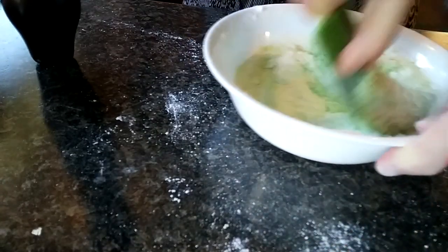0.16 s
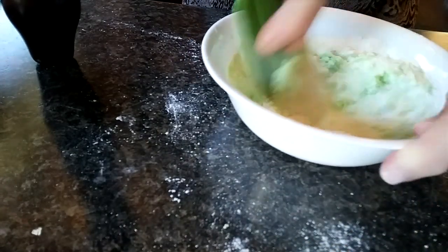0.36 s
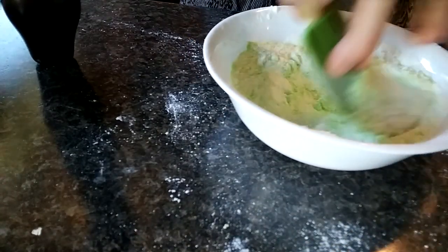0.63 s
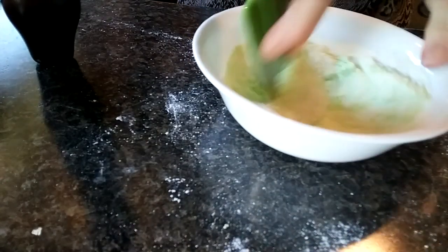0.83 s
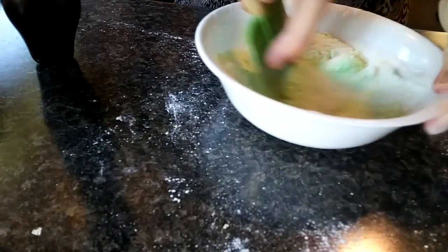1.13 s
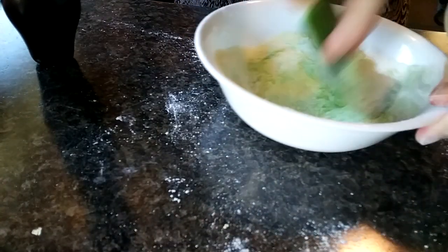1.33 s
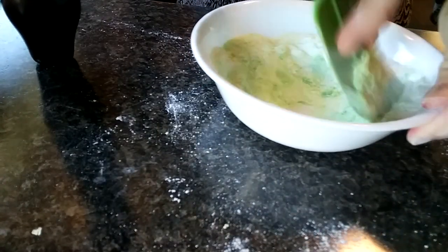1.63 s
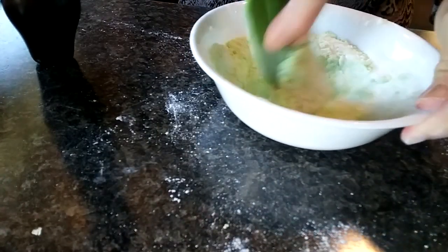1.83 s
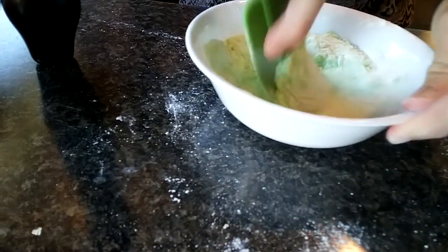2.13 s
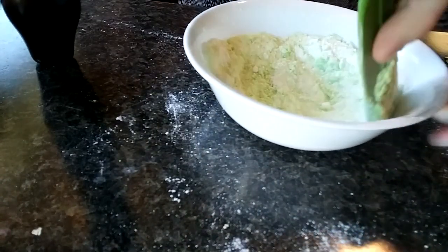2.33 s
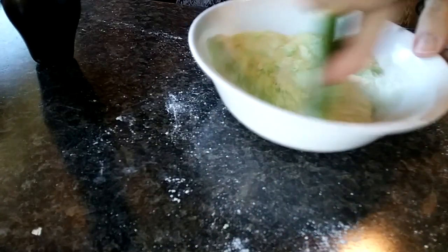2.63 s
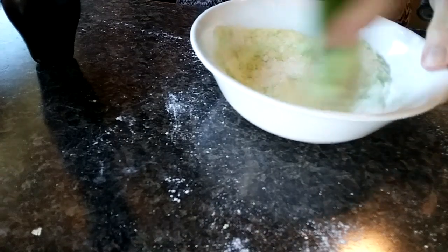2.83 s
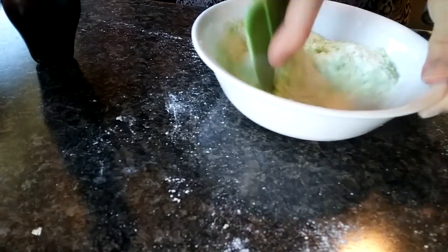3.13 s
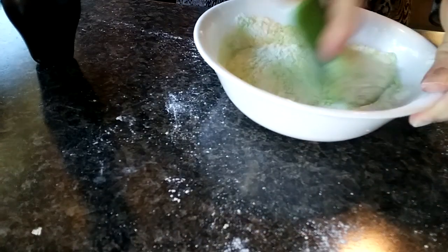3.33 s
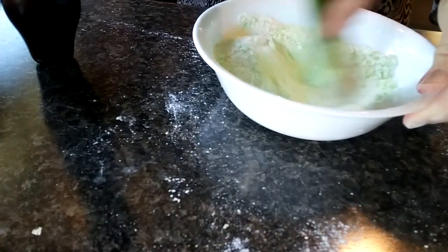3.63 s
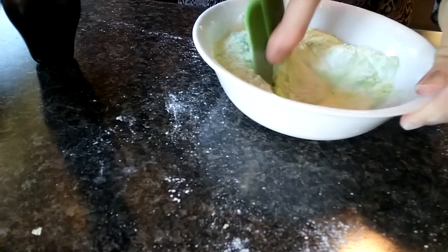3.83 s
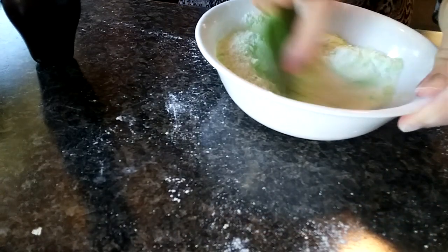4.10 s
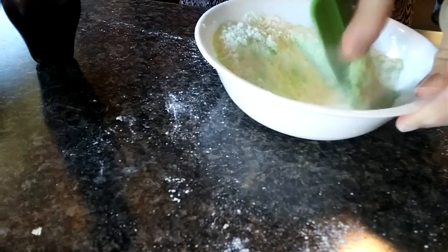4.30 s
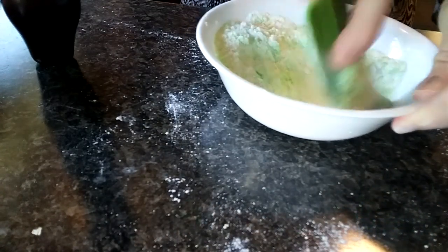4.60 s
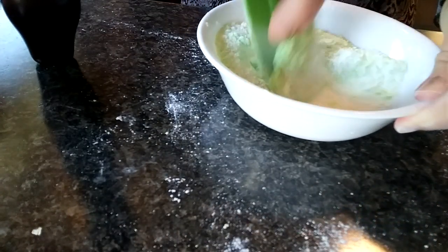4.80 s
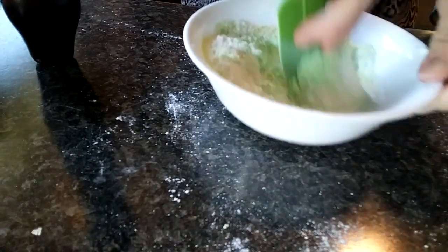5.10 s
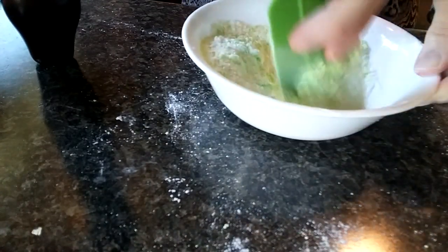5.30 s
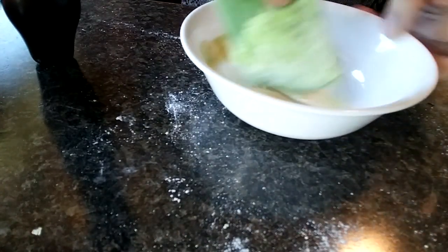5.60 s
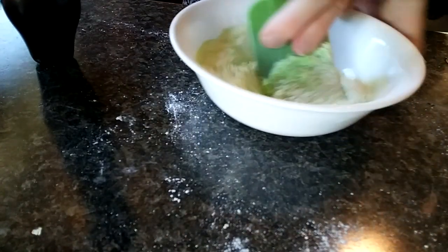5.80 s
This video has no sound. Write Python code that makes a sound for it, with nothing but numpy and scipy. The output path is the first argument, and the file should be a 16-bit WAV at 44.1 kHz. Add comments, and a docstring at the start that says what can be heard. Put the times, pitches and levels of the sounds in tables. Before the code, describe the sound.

Stirring is already in progress: a silicone spatula sweeps damp, sandy powder around a ceramic bowl on a stone counter. Each stroke bites, creeps, then breaks into a quick grainy swish with hollow, shifting colour and low bowl rumble. Broad swishes come at about 0.3 and 0.7 s. Around 0.9 s the blade judders on bare glaze, a coarse stuttering rasp with a faint squeak. Crunches follow from 1.1 s, with the loudest dull thump at 1.23 s. Strokes continue roughly every 0.3 s, turning brighter and thinner around 2.4-2.6 s, with thumps at 2.8 and 3.14 s. At 3.26 s a hard knock ticks, rings briefly and rattles the bowl. From 3.5 to 4.8 s the swishes are steady and even. Around 5.0-5.2 s heavier wall rubbing, crunches and a sharper thump arrive, then softer strokes to the end. Close stereo, short kitchen reflections, very quiet low air.

```python
"""A gritty swish is already under way: a silicone spatula stirs damp, sandy powder in a ceramic bowl.
The strokes are filtered grain noise shaped by blade speed; short runs of grains crunch and ping the glaze.
Dull thumps are decaying modes of bowl and counter. Once the blade judders in a slipping rasp with a squeak,
and once the tool knocks the bowl: a tick, a ring and a brief rattle on the stone counter.
Noise reflections place it all in a kitchen with quiet air."""
import sys
import numpy as np
from scipy import signal
from scipy.fft import rfft, irfft
from scipy.io import wavfile

SR = 44100
rng = np.random.default_rng(int(sys.argv[2]) if len(sys.argv) > 2 else 0)


def generate_wav(sig):
    """Save sig (samples, or channels by samples) to the path in sys.argv[1] as 16-bit PCM at SR."""
    pcm = np.round(np.clip(np.atleast_2d(sig).T, -1, 1) * 32767).astype(np.int16)
    wavfile.write(sys.argv[1], SR, pcm)


N = 262395
TIME = np.arange(N) / SR


def from_db(db):
    """Decibels to gain."""
    return 10 ** (np.asarray(db) / 20)


def rms_one(x):
    """Scale to rms 1."""
    return x / np.sqrt(np.mean(x ** 2) + 1e-20)


def at_hz(points, hz):
    """Read a table on a log-frequency axis."""
    f, value = np.transpose(points)
    return np.interp(np.log(np.maximum(hz, 1)), np.log(f), value)


def convolve(x, response):
    """Pass a signal through a response, channel by channel."""
    return signal.fftconvolve(np.atleast_2d(x), np.atleast_2d(response), axes=-1)[:, :N]


def causal(points, size=8192):
    """Minimum-phase response with the given spectrum, by folding its cepstrum."""
    spectrum = from_db(at_hz(points, np.fft.rfftfreq(size, 1 / SR)))
    cepstrum = irfft(np.log(spectrum))
    cepstrum[1:size // 2] *= 2
    cepstrum[size // 2 + 1:] = 0
    return irfft(np.exp(rfft(cepstrum)))


def colour(x, points):
    """Give white excitation a spectrum and keep its power."""
    response = causal(points)
    return convolve(x, response / np.linalg.norm(response))


def resonate(x, hz, width_hz):
    """A two-pole resonance with a peak gain of 1."""
    r = np.exp(-np.pi * width_hz / SR)
    top = np.array([1, 0, -1]) * (1 - r * r) / 2
    bottom = [1, -2 * r * np.cos(2 * np.pi * hz / SR), r * r]
    return signal.lfilter(top, bottom, x + 1e-18)


def drift(rate):
    """Smooth random wander of rms 1, with this many new random points a second."""
    knots = rng.standard_normal(N // 8)
    return rms_one(np.interp(TIME * rate, np.arange(len(knots)), knots))


def grains(per_s, spread_db, clump_db, clump_rate, alike):
    """Tiny clicks of uneven size and uneven level; some reach both channels, some one. Stereo, rms 1."""
    sizes = from_db(spread_db * np.minimum(rng.exponential(1, (3, N)), 3))
    sizes = sizes * rng.choice([-1, 1], (3, N))
    clicks = sizes * (rng.random((3, N)) < per_s / SR)
    alike = np.clip(alike, 0, 1)
    heard = np.sqrt(alike) * clicks[0] + np.sqrt(1 - alike) * clicks[1:]
    return rms_one(heard * from_db(clump_db * drift(clump_rate)))


def bursts(starts, lengths, dbs, rise):
    """Pressure peaks after a share (rise) of each burst's length, then dies away."""
    out = np.zeros(N)
    for s, length, db in zip(starts, lengths, dbs):
        part = slice(int(s * SR), int(s * SR) + SR // 4)
        age = np.maximum(TIME[part] - s, 0) / (rise * max(length, .001))
        out[part] += from_db(db) * age * np.exp(1 - age)
    return out


def struck(modes, scatter_db, detune, channel_lag_s):
    """Half a second of stereo ringing: grip and powder load shift the modes from blow to blow."""
    hz, db, t60 = np.transpose(modes)[:, :, None]
    strength, shift, side = rng.standard_normal((3,) + hz.shape)
    age = TIME[:SR // 2]
    # each mode radiates its own way, so it reaches one channel late
    lag = channel_lag_s * np.maximum(side * np.array([1, -1])[:, None, None], 0)
    arrived = np.maximum(age - lag, 0)
    swing = np.sin(2 * np.pi * hz * (1 + detune * shift) * arrived)
    decay = from_db(db + scatter_db * strength - 60 * age / t60)
    return np.sum(decay * swing, axis=1)


def add(out, s, sound):
    """Mix a stereo sound in at a time."""
    start = int(s * SR)
    out[:, start:start + sound.shape[1]] += sound[:, :N - start]


def brighten(x, db, pivot_hz=5500):
    """Tip the balance between the bands above and below a pivot."""
    def band(kind):
        """One side of a crossover: the same filter run twice."""
        sections = signal.butter(2, pivot_hz, kind, fs=SR, output="sos")
        return signal.sosfilt(np.tile(sections, (2, 1)), x)
    return band("low") * from_db(-db / 2) + band("high") * from_db(db / 2)


# quiet kitchen air: (f/Hz, level/dB), relative
AIR_COLOUR = [(25, -48), (65, 4.5), (130, 4), (300, -5.5), (420, 1), (560, -6), (760, -34), (1100, -34),
              (4000, -23.5), (16000, -29)]
AIR_DB = -60  # before the channels are blended


def kitchen_air():
    """Steady coloured noise, partly shared between the channels."""
    air = colour(rng.standard_normal((2, N)), AIR_COLOUR)
    return from_db(AIR_DB) * (0.65 * air + 0.37 * air[::-1])


# a stroke bites in, creeps, then breaks loose and sweeps
BITE_S, BREAK_LOOSE = .008, 1.03  # bite time, abruptness of breaking loose
CREEP_DB = -17  # creep speed against top speed
# the hand leans hardest at the plunge, eases off, and lets go a little after top speed
EASE_DB_PER_S, FOLLOW_THROUGH_S, LET_GO_DB_PER_S = 21.5, 0.046, 153


def stroke(age, push_s, slowing_s):
    """Speed of the blade and load on the bowl through one stroke, each at most 1."""
    bite = np.clip(age / BITE_S, 0, 1)
    held = bite * from_db(-LET_GO_DB_PER_S * np.maximum(age - push_s - FOLLOW_THROUGH_S, 0))
    past_top = np.maximum((age - push_s) / slowing_s, -10)
    sweep = bite * np.exp((1 - np.exp(-BREAK_LOOSE * past_top)) / BREAK_LOOSE - past_top)
    speed = np.maximum(sweep, from_db(CREEP_DB) * held)
    load = held * from_db(-EASE_DB_PER_S * np.maximum(age, 0))
    return speed, load


# strokes of the blade; deep powder muffles the swish, a thin layer on the glaze sharpens it:
# (plunge t/s, push to top speed t/s, slowing t/s, swish of the grains level/dB,
#  rub on the wall level/dB, rumble on the counter level/dB, brightness level/dB)
BLADE_STROKES = [(-.07, 0.11, 0.044, -46, -44.5, -46, -1.5), (0.256, .15, 0.048, -44, -40.5, -43.5, -1.5),
                 (0.661, 0.23, 0.036, -45.5, -40.5, -47, 1.5), (.96, 0.058, 0.075, -65, -47, -46, 2),
                 (1.088, 0.045, 0.04, -50, -46, -46, -1), (1.208, 0.032, 0.05, -46.5, -44, -42.5, -10),
                 (1.433, .14, 0.031, -44, -44.5, -45, 0), (1.768, .12, 0.029, -46.5, -45, -47, -2),
                 (2.071, 0.12, 0.042, -48.5, -43.5, -44, -3), (2.375, 0.012, 0.021, -55, -41, -46.5, 10.5),
                 (2.468, 0.038, 0.025, -56, -102, -88, 12), (2.596, 0.086, 0.045, -48, -44.5, -45.5, 13),
                 (2.77, 0.073, 0.026, -45.5, -43.5, -42, -6), (2.91, 0.071, 0.03, -61, -53, -61, -9),
                 (3.03, 0.043, 0.038, -53.5, -44, -42.5, 4), (3.137, 0.076, 0.035, -48.5, -48, -42, -3.5),
                 (3.408, 0.038, 0.075, -56, -55, -62, 2.5), (3.548, 0.075, 0.024, -52, -50, -56.5, -7),
                 (3.803, 0.12, 0.032, -49.5, -46, -53, -3.5), (4.098, 0.12, 0.027, -44.5, -43.5, -51, -4),
                 (4.404, 0.12, 0.025, -43.5, -44, -49.5, -4), (4.71, 0.13, 0.025, -42.5, -43.5, -48, -4.5),
                 (5.045, 0.089, 0.027, -48, -37.5, -38.5, 0), (5.21, 0.045, 0.023, -45.5, -39.5, -40, -4.5),
                 (5.419, 0.079, 0.039, -46.5, -44.5, -48, -0.5), (5.66, .04, 0.047, -53, -50.5, -51.5, 1),
                 (5.779, 0.11, 0.062, -51.5, -47.5, -50, 2)]
SLOW_BRIGHTER_DB = 6  # extra brightness of single slow grains
RUB_POWER = 0.79  # the rub grows with speed to this power


def hand():
    """All strokes in turn: gains of swish, rub and rumble, and the brightness of the swish in dB."""
    swish, rub, rumble, bright = np.zeros((4, N))
    for s, push_s, slowing_s, swish_db, rub_db, rumble_db, bright_db in BLADE_STROKES:
        part = slice(max(int(s * SR), 0), int(s * SR) + SR)
        speed, load = stroke(TIME[part] - s, push_s, slowing_s)
        swish_gain = from_db(swish_db) * speed
        swish[part] += swish_gain
        rub[part] += from_db(rub_db) * speed ** RUB_POWER
        rumble[part] += from_db(rumble_db) * load
        bright[part] += swish_gain * (bright_db + SLOW_BRIGHTER_DB * (1 - speed))
    # overlapping strokes share the brightness by their swish
    return swish, rub, rumble, bright / (swish + 1e-12)


# short echoes off the bowl's wall and the counter: (delay t/s before drift, level/dB)
BOWL_ECHOES = [(.00035, -15), (.0008, -13.5), (.0014, -16), (.0023, -8)]


def hollow(x, travel=0.244, sweep_rate=7):
    """As the blade circles, its echo paths wander at random, so the hollow colour keeps moving."""
    out = x.copy()
    for k, (delay, db) in enumerate(BOWL_ECHOES):
        for channel in (0, 1):
            path = delay * np.exp(travel * np.tanh(drift(sweep_rate)))
            echo = np.interp(TIME - path, TIME, x[channel], left=0)
            out[channel] += (-1) ** k * from_db(db) * echo
    power = 1 + sum(from_db(db) ** 2 for delay, db in BOWL_ECHOES)
    return out / np.sqrt(power)


# grains sliding past the blade: (f/Hz, level/dB), relative
SWISH_COLOUR = [(500, -9.5), (1000, 0.5), (1400, 2), (2300, -0.5), (3000, -1), (4000, -4), (5200, -3),
                (6500, -1), (7500, -2.5), (8300, -5.5), (8950, -20), (10000, -7), (12500, -12.5),
                (16000, -18)]
# bowl wall under rubbing and jolting grains: (f/Hz, level/dB), relative
WALL_COLOUR = [(120, -18), (280, -4.5), (410, -18), (530, 2.5), (620, -0.5), (710, -6.5), (810, -4.5),
               (980, -18), (1500, -23), (3000, -50)]
# bowl shaking on the counter: (f/Hz, level/dB), relative
RUMBLE_COLOUR = [(25, -59.5), (45, -2), (62, -3.5), (80, 2), (120, -12.5), (190, -9), (280, -13),
                 (420, -14.5), (900, -47.5)]
# damp lumps in the powder: how many pass the blade, and how much they sway the level
LUMPS_PER_S, LUMP_DB = 54, 0.94


def stirring():
    """Grains slide past the blade, drag on the wall and shake the bowl; lumps make the going uneven."""
    swish, rub, rumble, bright_db = hand()
    lumps = from_db(LUMP_DB * drift(LUMPS_PER_S))
    sliding = grains(per_s=9000, spread_db=5.5, clump_db=1.5, clump_rate=180, alike=0.49)
    sand = colour(swish * lumps * sliding, SWISH_COLOUR)
    sand = hollow(brighten(sand, bright_db))
    dragging = grains(per_s=6000, spread_db=3, clump_db=2.0, clump_rate=110, alike=0.88)
    wall = colour(rub * lumps * dragging, WALL_COLOUR)
    shake = colour(rumble * rng.standard_normal(N), RUMBLE_COLOUR)
    return sand + wall + shake


# clumps of grit crushed under the blade:
# (start t/s, length t/s, crackle level/dB, bowl wall level/dB, brightness level/dB)
GRIT_CRUNCHES = [(0.253, 0.016, -57.5, -61, 14), (0.291, 0.0083, -72, -37, -5), (0.39, .012, -45, -33, -11),
                 (.659, 0.0054, -53.5, -52, 11), (1.127, 0.014, -37, -26.5, -3),
                 (1.143, 0.0086, -43, -32, -7), (1.211, 0.0044, -31.5, -22.5, 0),
                 (1.228, .0068, -26, -17, -8), (1.43, 0.026, -52, -43, 0),
                 (1.483, 0.0037, -37.5, -30.5, -3.5), (1.774, 0.012, -38, -25, 0),
                 (1.808, 0.0068, -40, -33, -9.5), (2.066, 0.026, -48, -44, 2),
                 (2.087, 0.0046, -32, -26, 2.5), (2.111, 0.0055, -37, -37, -4),
                 (2.367, 0.038, -48.5, -41, -1), (2.598, 0.0046, -44, -47, 14.5),
                 (2.664, 0.0071, -43.5, -64, 7), (2.678, 0.016, -42.5, -34, 6), (2.724, 0.02, -47, -36, -8),
                 (2.765, 0.015, -70, -29.5, -9), (2.913, 0.0069, -44.5, -43, -4),
                 (3.024, 0.034, -47.5, -47, 6), (3.813, 0.0057, -46, -42, 6.5),
                 (4.111, 0.016, -52.5, -51, 4), (4.401, 0.014, -45.5, -52, 2), (4.421, 0.0052, -45, -42, 3),
                 (4.747, 0.009, -44.5, -40, -2), (5.042, 0.039, -60, -39.5, 8),
                 (5.082, 0.01, -43, -33.5, 1), (5.122, 0.012, -42, -33, -13),
                 (5.134, 0.014, -38.5, -29.5, 1.5), (5.421, 0.0071, -42, -34, -5),
                 (5.777, 0.029, -54.5, -39, 6)]
# breaking grains: (f/Hz, level/dB), relative
CRACKLE_COLOUR = [(500, -7.5), (1300, 13), (2000, 3.5), (3200, 2.5), (5600, -0.5), (6500, -2.5), (7500, 7),
                  (8300, 0.5), (9000, -8), (10500, -9.5), (12000, -7), (16000, -11)]
# glaze pinged by crushed grains: (f/Hz, width f/Hz, level/dB against the crackle)
GLAZE_PINGS = [(6390, 215, 11), (10240, 450, 3), (10700, 510, 10.5), (13500, 550, 5.5)]


def crunches():
    """Trapped grains break in quick runs, ping the glaze and jolt the wall."""
    s, length, crackle_db, wall_db, bright_db = np.transpose(GRIT_CRUNCHES)
    breaks = grains(per_s=12000, spread_db=2, clump_db=2.5, clump_rate=680, alike=0.11)
    crackle = colour(breaks * bursts(s, length, crackle_db, rise=0.53), CRACKLE_COLOUR)
    # the latest crunch sets the brightness
    latest = np.maximum(np.searchsorted(s, TIME, side="right") - 1, 0)
    crackle = hollow(brighten(crackle, bright_db[latest]))
    pings = sum(from_db(db) * resonate(crackle, hz, width) for hz, width, db in GLAZE_PINGS)
    jolts = grains(per_s=8000, spread_db=3, clump_db=-2.0, clump_rate=340, alike=0.83)
    wall = colour(jolts * bursts(s, length, wall_db, rise=0.32), WALL_COLOUR)
    return crackle + pings + wall


# modes of bowl and counter under a soft blow: (f/Hz, level/dB, t60 t/s), levels relative
BODY_MODES = [(63.7, -10.5, 0.2), (84.3, -5.5, 0.23), (117.3, -3, 0.22), (147.5, -7, 0.16),
              (191.5, 2.5, 0.076), (227, -7, 0.077), (283.6, -2, 0.084), (364.7, -8, 0.1),
              (531, -1.5, 0.052), (620, 0.5, 0.032), (797, -2.5, 0.046), (1250, -11.5, 0.013),
              (1490, -7, 0.0076)]


def blow(db, hz):
    """The softer the contact, the fewer of the body's upper modes it reaches."""
    body = struck(BODY_MODES, scatter_db=2.37, detune=0.046, channel_lag_s=0.00026)
    body = signal.sosfilt(signal.butter(2, hz, fs=SR, output="sos"), body)
    body = signal.sosfilt(signal.butter(2, 55, "high", fs=SR, output="sos"), body)
    return from_db(db) * body / np.abs(body).max()


# soft blows of the blade on the bottom: (t/s, peak level/dB, contact brightness f/Hz)
BLADE_THUMPS = [(.256, -32.5, 299), (0.666, -43, 245), (1.094, -28, 356.3), (1.232, -6, 930),
                (1.437, -24.5, 296), (1.778, -24, 930), (2.074, -29.5, 298), (2.099, -30, 160),
                (2.109, -19, 610), (2.201, -32.5, 302), (2.379, -28, 398), (2.806, -18.5, 420),
                (3.139, -13.5, 980), (3.408, -28, 363), (3.805, -34.5, 300), (4.102, -31.5, 356),
                (4.404, -29, 397), (4.416, -30.5, 199), (4.713, -20, 580), (5.045, -24, 304),
                (5.146, -28, 500), (5.215, -14.5, 1600), (5.227, -20, 450), (5.421, -19.5, 457)]
# the springy blade lands a second time, weaker and duller: delay, its scatter as a share, level, brightness
REBOUND_S, REBOUND_SCATTER, REBOUND_DB, REBOUND_HZ = 0.01181, 0.067, -13, 180


def thumps():
    """The blade meets the bottom of the bowl and rebounds once, a little differently each time."""
    out = np.zeros((2, N))
    for s, db, hz in BLADE_THUMPS:
        add(out, s, blow(db, hz))
        delay = REBOUND_S * np.exp(REBOUND_SCATTER * rng.standard_normal())
        add(out, s + delay, blow(db + REBOUND_DB, REBOUND_HZ))
    return out


# the blade slips on bare glaze: (start t/s, length t/s, level/dB)
GLAZE_SLIPS = [(0.873, 0.021, -43), (0.893, 0.011, -31.5), (0.9048, 0.0046, -22.5), (0.914, 0.0059, -30),
               (0.919, 0.011, -24.5), (0.928, 0.0039, -21.5), (0.935, 0.012, -38)]
# slipping rubber: (f/Hz, level/dB), relative
RASP_COLOUR = [(60, -20), (200, -6.5), (400, -5.5), (580, 1.5), (900, -7.5), (1200, -8.5), (2000, -13.5),
               (2900, -15), (4300, -22), (7000, -23), (9000, -34.5), (16000, -42)]
# faint squeak of the rubber edge: (t/s, level/dB)
SQUEAK_LEVEL = [(.90, -88), (.93, -34), (.965, -57), (.978, -65), (1.0, -74), (1.05, -92)]
SQUEAK_HZ, SQUEAK_WIDTH_HZ = 2710, 320


def judder():
    """Rubber sticks and slips on the glaze: a coarse rasp that trails off in a squeak."""
    slips = grains(per_s=4900, spread_db=1.5, clump_db=1.0, clump_rate=500, alike=0.95)
    rasp = colour(slips * bursts(*np.transpose(GLAZE_SLIPS), rise=0.32), RASP_COLOUR)
    squeak = resonate(rng.standard_normal(N), SQUEAK_HZ, SQUEAK_WIDTH_HZ)
    squeak = rms_one(resonate(squeak, SQUEAK_HZ, 2 * SQUEAK_WIDTH_HZ))
    s, db = np.transpose(SQUEAK_LEVEL)
    return hollow(rasp + from_db(np.interp(TIME, s, db)) * squeak)


# the bowl's ringing modes: (f/Hz, level/dB, t60 t/s), levels relative
RING_MODES = [(245, -7.5, 0.55), (344.3, 5.5, 0.29), (349, -4, 0.55), (457, -12, 0.11), (570, -1, 0.17),
              (759, 8, 0.093), (784, 6, 0.1), (862, -1, 0.22), (907, -3, 0.24), (956, -0.5, 0.14),
              (1100, -27, .06), (1230, -28, 0.17), (1280, -37, 0.16)]
# the contact tick: (f/Hz, level/dB), relative
TICK_COLOUR = [(300, 6), (1300, -9), (1800, -13), (2400, -9), (3000, 0), (3700, -5), (4400, 1.5),
               (5600, 4.5), (6500, 10.5), (8000, 0), (9000, -12), (11000, -2), (16000, -25)]
# the bowl rattling on the counter: (f/Hz, level/dB), relative
RATTLE_COLOUR = [(100, -32), (230, 3), (420, 0), (580, 3), (680, 1), (780, -6), (950, 4), (1060, -7),
                 (1350, -3), (1550, -31), (3000, -39)]
KNOCK_S, RING_DB, TICK_DB = 3.263, -28, -21.5
RATTLE_DB, RATTLE_S = -22.5, 0.021


def knock():
    """One hard touch ticks on the glaze, lets the bowl ring and rattles it on the stone."""
    ring = np.zeros((2, N))
    modes = struck(RING_MODES, scatter_db=-1.1, detune=0.0016, channel_lag_s=0.00032)
    add(ring, KNOCK_S, from_db(RING_DB) * modes)
    contact = bursts([KNOCK_S], [.004], [TICK_DB], rise=0.35)
    tick = colour(rng.standard_normal((2, N)) * contact, TICK_COLOUR)
    chatter = grains(per_s=2300, spread_db=-3.0, clump_db=1.0, clump_rate=370, alike=0.59)
    chatter = chatter * bursts([KNOCK_S], [RATTLE_S], [RATTLE_DB], rise=0.17)
    return ring + tick + colour(chatter, RATTLE_COLOUR)


# the kitchen's decay: (f/Hz, t60 t/s before scaling)
KITCHEN_DECAY = [(80, 0.71), (500, 0.62), (2000, 0.59), (7000, 0.22), (16000, 0.2)]
# likeness of the reflections in the two channels: (f/Hz, likeness, 1 is identical)
ROOM_LIKENESS = [(60, 0.83), (130, 0.98), (290, 1), (640, 0), (1400, 0.12), (16000, 0)]


def reflections(t60_scale, delay_s, count=10):
    """Stereo response: bands of noise about an octave apart that die away, most alike in the bass."""
    age, hz = TIME[:SR // 2], np.fft.rfftfreq(SR // 2, 1 / SR)
    mid, side = rfft(rng.standard_normal((2, len(age))))
    alike = np.clip(at_hz(ROOM_LIKENESS, hz), -1, 1)
    noise = np.sqrt(1 + alike) * mid + np.sqrt(1 - alike) * side * np.array([[1], [-1]])
    centres, out = np.geomspace(40, 16000, count), 0
    for centre, pick in zip(centres, np.eye(count)):
        t60 = t60_scale * at_hz(KITCHEN_DECAY, centre)
        fade = from_db(-60 * age / t60) * (age > delay_s)
        band = irfft(noise * at_hz(np.c_[centres, pick], hz), len(age))
        out = out + band * fade / np.linalg.norm(fade)
    return out / np.sqrt(2)


def scene():
    """The bowl's sounds, heard directly and off the kitchen walls, over quiet air."""
    air = kitchen_air()
    bowl = stirring() + crunches() + thumps() + judder() + knock()
    room = from_db(-8.0) * convolve(bowl, reflections(t60_scale=0.79, delay_s=0.0027))
    return bowl + room + air


# treble balance of the two microphone ports: (f/Hz, left minus right level/dB)
PORT_BALANCE = [(100, 0.5), (350, -2), (1300, 0.5), (5000, 0), (6400, 2.5), (7600, 8.5), (8300, -8),
                (9000, -10.5), (10500, -12.5), (12500, -4), (16000, -15)]
CUTOFF_HZ = 15900


def record(dry):
    """Each microphone port colours the sound in its own way; the deep bass and the top are cut."""
    ports = [causal([(hz, sign * db / 2) for hz, db in PORT_BALANCE]) for sign in (1, -1)]
    heard = convolve(dry, ports)
    heard = signal.sosfilt(signal.butter(4, 42, "high", fs=SR, output="sos"), heard)
    return signal.sosfilt(signal.ellip(12, .1, 80, CUTOFF_HZ, fs=SR, output="sos"), heard)


dry = scene()
out = record(dry)
generate_wav(out)
```